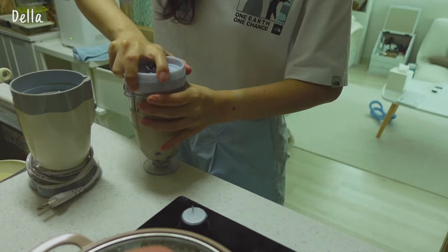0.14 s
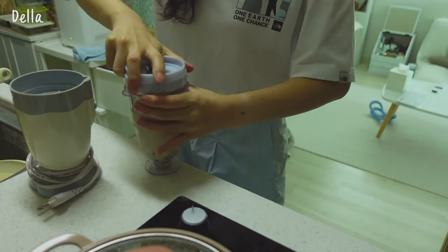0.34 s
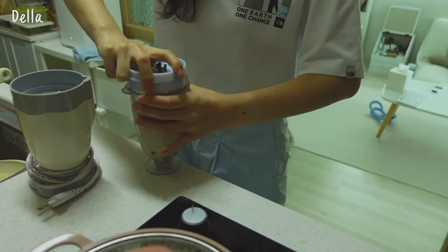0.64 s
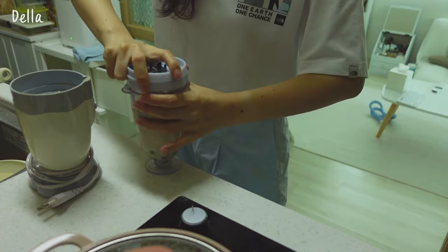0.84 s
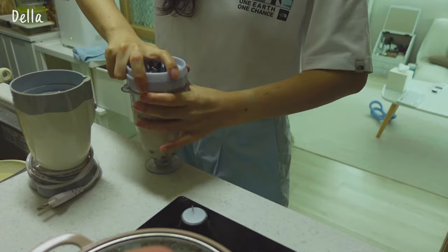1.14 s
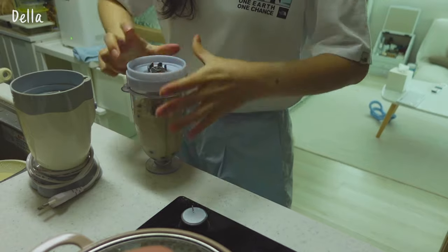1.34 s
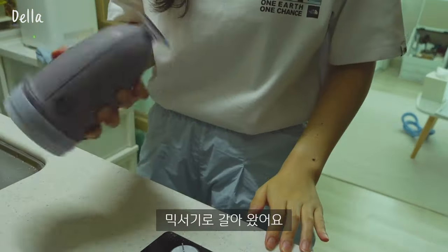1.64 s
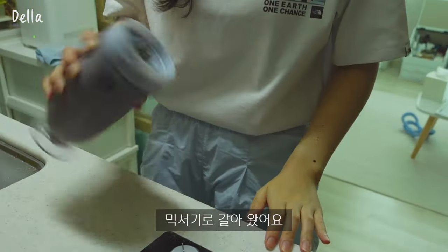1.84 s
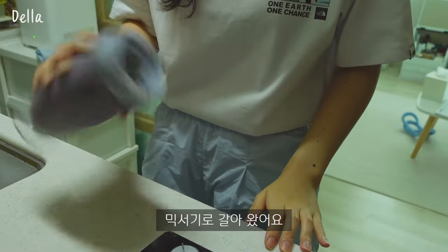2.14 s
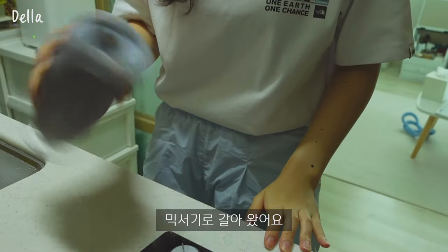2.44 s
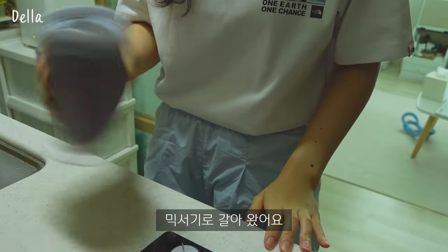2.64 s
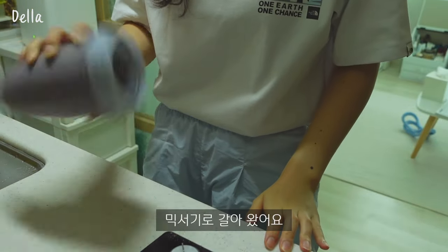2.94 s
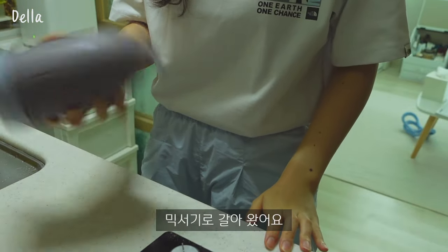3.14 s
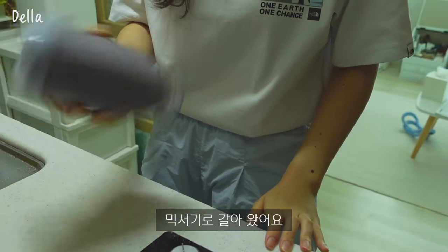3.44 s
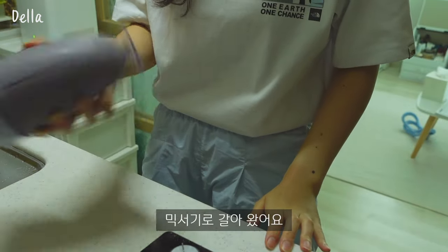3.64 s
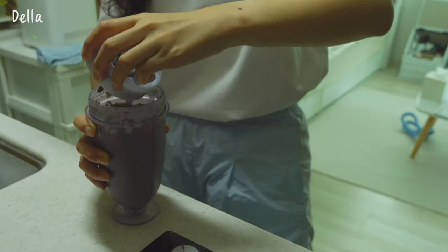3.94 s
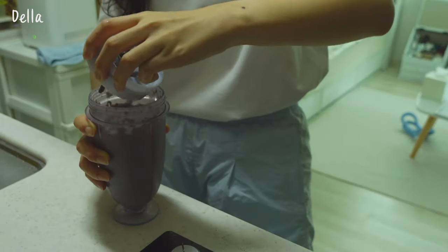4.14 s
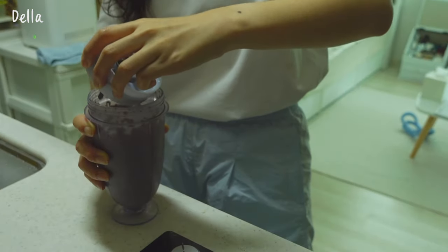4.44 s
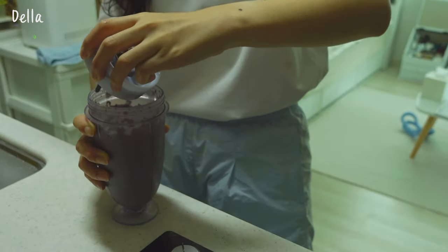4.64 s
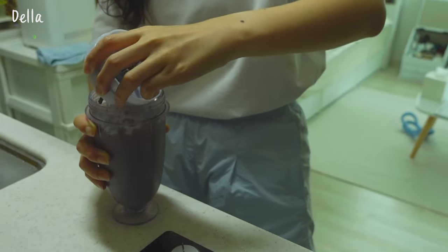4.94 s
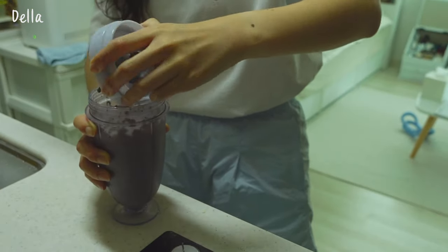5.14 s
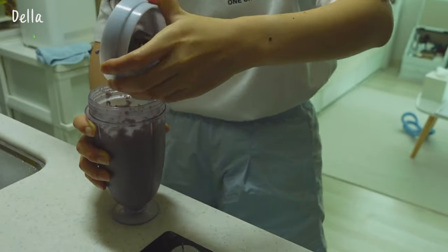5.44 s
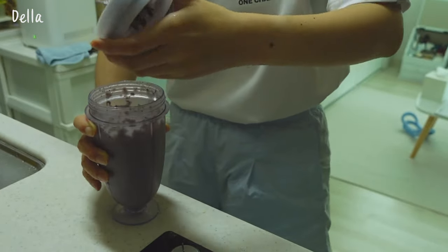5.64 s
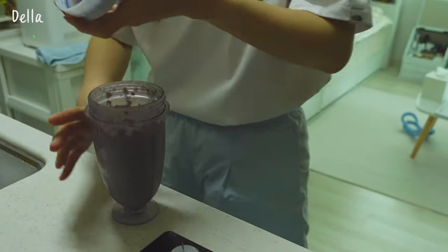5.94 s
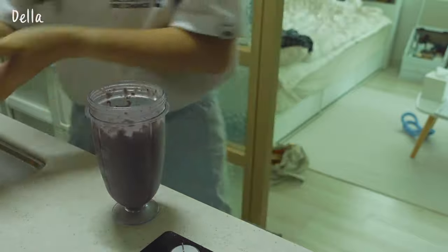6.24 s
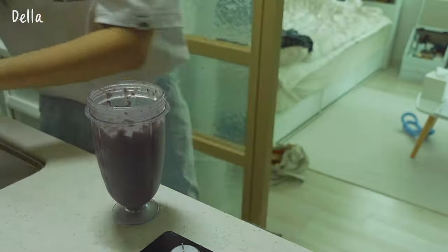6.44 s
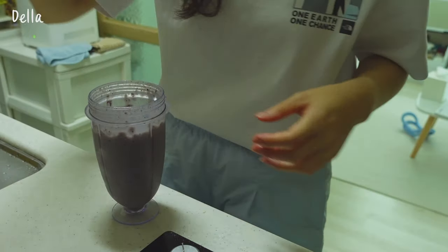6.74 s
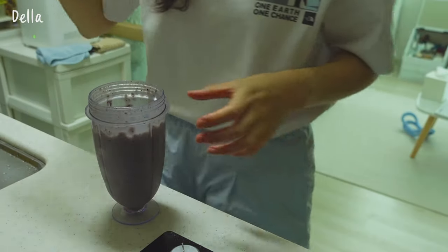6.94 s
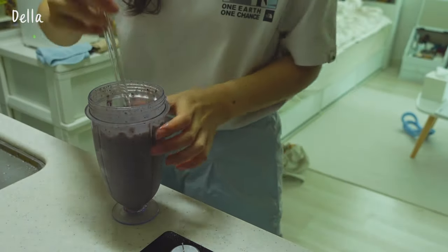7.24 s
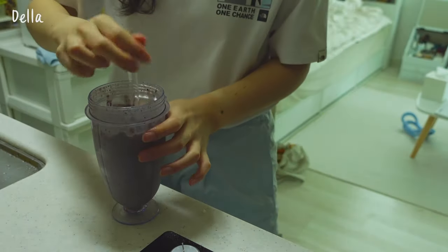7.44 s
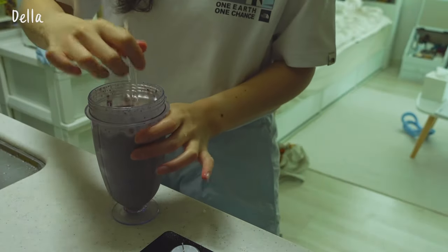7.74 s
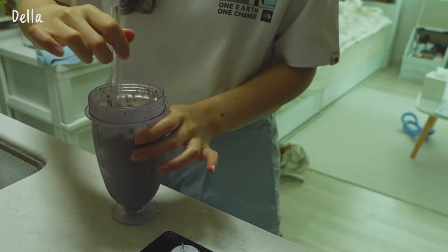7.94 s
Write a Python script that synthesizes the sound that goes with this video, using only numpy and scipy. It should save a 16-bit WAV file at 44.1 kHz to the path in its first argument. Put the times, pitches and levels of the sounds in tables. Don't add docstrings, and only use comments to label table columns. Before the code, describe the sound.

A low, broad appliance hum fills a small, briefly echoing kitchen, heard close from the counter. From 0 to 0.25 s a plastic lid drags and gives tiny sharp thread slips, with soft bumps; at about 0.75 to 1.05 s it creaks in fast, raspy stick-slip chirps, followed by hand rubs and dull bumps. At 1.64 s the sound drops out, fading back by 1.78 s. The cup is shaken until about 3.7 s: irregular short splashes and taps, a clear one at 1.75, the strongest at 3.18. From 3.83 to 4.9 s the lid is knocked on the rim roughly every 0.17 s, hard plastic cracks over a hollow boom and counter thud, with weaker rattles to 5.2. Rubbing follows at 5.64, a faint bright glass touch at 6.54, small ticks, then at 7.49 a loud, hard straw clunk with an immediate bounce and short ring. Hum remains, with a faint bump near 8.03.

```python
import sys
import numpy as np
from scipy import signal
from scipy.io import wavfile

SR = 44100
rng = np.random.default_rng(int(sys.argv[2]) if len(sys.argv) > 2 else 0)


def wrap_up_sound(samples):
    columns = np.atleast_2d(samples).T
    tamed = np.clip(columns, -1, 1)
    steps = np.round(tamed * 32767).astype(np.int16)
    wavfile.write(sys.argv[1], SR, steps)


def how_loud(loudness_db):
    steps = np.asarray(loudness_db, float) / 20
    return 10 ** steps


N = 356328
T = np.arange(N) / SR
EDGES = 30 * 2 ** np.arange(0, 9.4, .5)
MID_SIDE = np.array([[1], [-1]])


def rms_one(x):
    return x / np.sqrt(np.mean(x ** 2) + 1e-20)


def at_hz(points, hz):
    points_hz, values = np.transpose(points)
    return np.interp(np.log(hz), np.log(points_hz), values)


def drift(rate):
    r = np.exp(-80 * np.pi * rate / SR)
    slow = signal.lfilter([1], [1, -2 * r, r * r], rng.standard_normal(N // 40 + 2002))
    slow = rms_one(slow[2000:])
    return np.interp(np.arange(N) / 40, np.arange(len(slow)), slow)


def band(x, low_hz, high_hz, order=2):
    sos = signal.butter(order, [low_hz, min(high_hz, .48 * SR)], "band", fs=SR, output="sos")
    return signal.sosfilt(sos, x)


def resonance(x, hz, width):
    r = np.exp(-np.pi * width / SR)
    return signal.lfilter([(1 - r * r) / 2, 0, (r * r - 1) / 2],
                          [1, -2 * r * np.cos(2 * np.pi * hz / SR), r * r], x)


def strike(times, dbs, modes, spread_db, detune, rise):
    out, t = np.zeros(N + 9000), np.arange(9000) / SR
    hz, mode_db, t60 = np.repeat(modes, 2, axis=0).T[:, :, None]
    mode_db = mode_db - 5 * (np.arange(len(hz))[:, None] % 2)
    luck = rng.standard_normal((len(times), 3, len(hz), 1))
    for s, db, (strong, off, phase) in zip(times, dbs, luck):
        decay = how_loud(mode_db + spread_db * strong - 60 * t / t60)
        rings = decay * np.sin(2 * np.pi * hz * (1 + detune * off) * t + 4 * phase)
        body = rings.sum(axis=0) * (1 - np.exp(-t / rise))
        out[int(s * SR):][:len(t)] += how_loud(db) * body / np.abs(body).max()
    return out[:N]


def add_burst(out, s, db, low_hz, high_hz, t60, rise, order=2):
    t = np.arange(6000) / SR
    noise = rms_one(band(rng.standard_normal(len(t)), low_hz, high_hz, order=order))
    burst = how_loud(db - 60 * t / max(t60, .003)) * (1 - np.exp(-t / rise)) * noise
    i = int(s * SR)
    out[i:i + len(t)] += burst[:N - i]


def strokes(rows):
    out = np.zeros(N)
    for s, attack, hold, t60, db in rows:
        swell = np.clip((T - s) / max(attack, 1e-4), 0, 1) ** 2
        out += swell * how_loud(db - 60 * np.maximum(T - s - attack - hold, 0) / t60)
    return out


def banded_noise(spectrum, patchy_db):
    # f/Hz, correlation [0-1]
    likeness = [(60, 0.83), (240, 0.95), (950, 0.61), (3770, 0.77), (15000, 0.71)]
    out, white = 0, rng.standard_normal((2, 2, N))
    for k, (low, high) in enumerate(zip(EDGES, EDGES[1:])):
        mid, side = band(white[k % 2], low, high)
        hz = np.sqrt(low * high)
        alike = np.clip(at_hz(likeness, hz), 0, 1)
        gain = how_loud(at_hz(spectrum, hz) + patchy_db * drift(9.3))
        out = out + gain * (np.sqrt(1 + alike) * mid + np.sqrt(1 - alike) * side * MID_SIDE)
    return rms_one(out)


def hum():
    # f/Hz, level/dB
    hum_spectrum = [(36, -15), (75, -19), (140, -4.5), (400, -4), (570, -15.5), (1130, -17), (8990, -30.5),
                    (16500, -44)]
    # f/Hz, width/Hz, level/dB
    whines = [(146.3, 2.5, -53), (215, 40, -52.5), (400, 30, -52), (2620, 180, -62.5), (6300, 470, -64),
              (7140, 590, -66.5), (12500, 300, -71)]
    white = rng.standard_normal(N)
    whine = 0
    for hz, width, db in whines:
        whine = whine + how_loud(db) * rms_one(resonance(white, hz, width)) * how_loud(2.0 * drift(3.8))
    rumble_cut = signal.butter(4, 68, "high", fs=SR, output="sos")
    broad = signal.sosfilt(rumble_cut, banded_noise(hum_spectrum, patchy_db=1.8))
    return (how_loud(-40.5) * broad + whine) * how_loud([[-.3], [.3]])


def kitchen(x):
    # f/Hz, t60/s
    room_t60 = [(100, 0.31), (300, 0.32), (1000, 0.29), (4000, 0.2), (14000, 0.19)]
    # f/Hz, level/dB
    room_db = [(100, -11), (500, -10), (3000, -7), (14000, -7)]
    # f/Hz, share [0-1]
    sideways = [(100, 0.029), (500, 0.28), (3000, 0.4), (14000, 0.58)]
    t, tail = np.arange(SR // 2) / SR, 0
    for low, high in zip(EDGES[::2], EDGES[2::2]):
        shared, own = band(rng.standard_normal((2, len(t))), low, high)
        decay = how_loud(-60 * t / at_hz(room_t60, low) + at_hz(room_db, low))
        tail = tail + (shared + at_hz(sideways, low) * own * MID_SIDE) * decay
    tail = tail * (1 - np.exp(-(t / 0.00067) ** 2))
    return signal.fftconvolve(x[None], tail / np.sqrt(SR / 100), axes=1)[:, :N]


def rubbing():
    # f/Hz, level/dB
    skin = [(470, -31), (800, -22), (1950, 1), (2600, 2), (4460, -3.5), (4800, 4.5), (10700, -13),
            (16000, -7)]
    # start t/s, attack/s, hold/s, release t60/s, level/dB
    rubs = [(.3, 0.13, .005, 0.17, -45), (.616, 0.0037, .005, .25, -56), (1.045, .005, 0.006, 0.37, -44.5),
            (1.09, 0.027, 0.21, 1, -52.5), (1.228, .004, 0.0045, 0.11, -47), (5.638, .004, 0.11, 0.17, -39),
            (5.75, 0.074, 0.14, .2, -53.5)]
    grains = rng.standard_normal((2, N)) * how_loud(2.0 * drift(80))
    colour = 0
    for k, (low, high) in enumerate(zip(EDGES[9:], EDGES[10:])):
        colour = colour + how_loud(at_hz(skin, np.sqrt(low * high))) * band(grains[k % 2], low, high)
    return rms_one(colour) * strokes(rubs)


def handling():
    # t/s, peak level/dB, f/Hz, bright edge over the peak/dB
    taps = [(0.376, -46, 2140, -3), (1.7548, -22, 1770, -11.5), (1.9789, -35, 1990, -29),
            (2.3414, -34.5, 1780, -35), (2.6249, -36.5, 2220, -27), (2.7685, -36, 1510, -14),
            (2.8863, -27, 1790, -19.5), (3.0886, -36.5, 2120, -22), (3.114, -34.5, 1340, -13),
            (3.1216, -28, 1830, -27), (3.1795, -14, 1730, -14), (3.3618, -29, 1180, -23.5),
            (3.4176, -38, 1790, -24), (3.4645, -34.5, 2300, -31), (3.6151, -29, 2140, -14.5),
            (3.7313, -29, 2140, -21)]
    # t/s, peak level/dB, f/Hz, dull body over the peak/dB
    ticks = [(0.6706, -48, 8800, -11), (0.703, -50, 9250, -11), (1.2308, -45, 6150, 3.5),
             (1.2854, -50, 6300, 3), (5.0985, -45.5, 6470, 4.5), (5.2705, -49, 6600, 4),
             (6.0995, -51.5, 6140, -7), (6.536, -42.5, 7540, 9), (6.649, -47.5, 9500, 4),
             (6.9325, -45, 5800, -9), (7.1894, -53, 5070, -3)]
    # t/s, peak level/dB, f/Hz, t60/s
    bumps = [(0.019, -40, 228, 0.17), (0.178, -42, 184, 0.17), (0.435, -31.5, 175, 0.17),
             (0.88, -35, 172, 0.11), (1.248, -30.5, 236, 0.12), (1.429, -43, 573, 0.1),
             (1.599, -44, 332, 0.1), (2.24, -26.5, 298, 0.064), (2.885, -35, 366, 0.17),
             (3.361, -31, 525, 0.085), (6.536, -35, 400, 0.08), (8.035, -42, 220, 0.33)]
    # t/s, peak level/dB, f/Hz, t60/s
    sparks = [(0.146, -38, 2200, 0.14), (.2, -39, 2280, 0.13), (5.642, -34.5, 3570, 0.057),
              (5.72, -36, 733, 0.19), (6.539, -38.5, 5670, 0.13), (6.538, -50, 1100, 0.054),
              (6.934, -39, 13500, .04), (6.95, -40, 12500, 0.059), (3.1788, -18, 2160, 0.025),
              (3.18, -28, 5440, .07)]
    out = np.zeros(N)
    both = [(s, db, hz, db + edge_db, 3800, 0.031) for s, db, hz, edge_db in taps]
    both += [(s, db + body_db, 2250, db, hz, 0.057) for s, db, hz, body_db in ticks]
    for s, db, hz, edge_db, edge_hz, t60 in both:
        add_burst(out, s, db, hz / 1.66, hz * 1.36, t60, .0004)
        add_burst(out, s, edge_db + 8, edge_hz, edge_hz * 1.21, 1.46 * t60, .0003, order=1)
    for s, db, hz, t60 in bumps:
        add_burst(out, s, db + 5.5, hz / 1.26, hz * 1.19, t60, 0.29 / hz)
    for s, db, hz, t60 in sparks:
        add_burst(out, s, db, hz / 1.1, hz * 1.07, t60, .0005)
    return out


def glassware():
    # t/s, peak level/dB
    straw_drop = [
        (7.488, -13),
    ]
    # f/Hz, level/dB, t60/s
    straw_modes = [(229.5, -3, 0.11), (429, -4, 0.13), (444, 1, 0.18), (484, -7, 0.046), (539, -6.5, 0.12),
                   (757, -12, 0.11), (1350, 0, 0.076), (1390, 0.5, 0.14), (1480, 0.5, 0.061),
                   (2460, -23, .04)]
    # t/s, peak level/dB
    lid_clink = [
        (6.535, -39),
    ]
    # f/Hz, level/dB, t60/s
    glass_modes = [(8200, -4, 0.22), (12880, -2, 0.14)]
    (s, db), (clink_s, clink_db) = straw_drop[0], lid_clink[0]
    out = strike([s, s + 0.0055], [db + 2.5, db + 1.5], straw_modes, 0.73, 0.0162, 0.00089)
    out = out + strike([clink_s], [clink_db + 10], glass_modes, 0, 0.0035, .0003)
    add_burst(out, s, db - 12, 300, 1700, .16, .001)
    add_burst(out, s, db - 2.5, 3000, 4300, .025, .0002)
    add_burst(out, s, db - 7.0, 1700, 6000, .06, .0001)
    add_burst(out, s, db - 7.5, 3000, 11000, .03, .0001)
    add_burst(out, s, db + 5.0, 2500, 12000, .003, .00003, order=1)
    return out


def creak():
    # start t/s, attack/s, hold/s, release t60/s, level/dB
    twists = [
        (.75, 0.028, 0.029, 0.24, -34),
        (0.818, 0.016, 0.096, 0.061, -37.5),
        (0.966, 0.0061, 0.084, .07, -41),
    ]
    twist_s = (.195, 0.13)
    # at the start/Hz, at the end/Hz
    slips_per_s = [(330.3, 150), (250, 140)]
    # start t/s, attack/s, hold/s, release t60/s, level/dB
    drag = [
        (0.0, 0.00056, 0.18, .9, -48.5),
        (.14, .005, 0.062, .15, -49),
    ]
    # t/s, peak level/dB
    slips = [(0.1446, -20), (0.196, -21.5), (0.2144, -30), (0.2239, -22.5), (0.2319, -19.5), (0.7572, -21)]
    # f/Hz, width/Hz, level/dB
    thread = [(2300, 740, -1.5), (4900, 700, 3), (5630, 1000, 3), (7550, 560, 2.5), (9240, 1800, 1.5),
              (12000, 1400, 0.5), (14200, 1400, 2)]
    # loose f/Hz, tight f/Hz
    grip_hz = (3600, 3920)
    tightens_s = (0.85, 0.82)
    tight_share = (0.054, .75)
    # start t/s, end t/s
    damped_s = (.855, 0.9)

    speed = []
    for (s, *_), length, (fast, slow) in zip(twists[::2], twist_s, slips_per_s):
        speed += [(s, fast), (s + 0.41 * length, fast), (s + length, slow)]
    rate = np.interp(T, *np.transpose(speed)) * how_loud(.4 * drift(60))
    turns = np.cumsum(rate) / SR
    beats = np.diff(np.floor(turns), prepend=0) * how_loud(1.5 * rng.standard_normal(N))
    grind = signal.lfilter([1], [1, -.96], beats) * rng.standard_normal(N)
    snaps = band(beats, 2500, 7000, order=1)
    chatter = .7 * rms_one(snaps) + .35 * rms_one(grind) + .6 * rng.standard_normal(N)
    drive = chatter * strokes(twists) * how_loud(6.5)
    drive = drive + strokes(drag) * how_loud(6.5) * rng.standard_normal(N)
    for s, db in slips:
        add_burst(drive, s, db + 1.5, 3000, 14000, .016, .0001, order=1)

    tight = np.where(T < twists[0][0], .6, np.interp(T, tightens_s, tight_share))
    tight = np.clip(tight, 0, 1)
    grip = resonance(drive * (1 - tight), grip_hz[0], 340) + resonance(drive * tight, grip_hz[1], 420)
    out = how_loud(8.5 + np.interp(T, damped_s, (0, -1.5))) * grip
    for k, (hz, width, db) in enumerate(thread):
        out = out + (-1) ** k * how_loud(db) * resonance(drive, hz, width)
    return out


def knocks():
    # crack/dB, shine/dB, wall ring/dB
    rim_knocks = [(3.8343, -16.5, 5.5, 1, 1), (4.0446, -18.5, 6, 5.5, 3.5), (4.2157, -15, 5, 5, -2.5),
                  (4.2636, -35.5, 11, 8.5, 9), (4.3867, -17.5, 5, 3.5, 1.5), (4.5553, -20, -6, 4, 1.5),
                  (4.557, -24, 12, 8, 2), (4.7209, -23.5, 0, 8.5, -2), (4.7246, -14, 3, 5.5, -0.5),
                  (4.8688, -17.5, 4.5, 4.5, -1.5), (4.8742, -24.5, 9.5, 10, 4), (4.99, -39, 3, 2, -11),
                  (5.007, -30.5, 2, 4.5, 0), (5.0212, -30, 3.5, 5, -8), (5.214, -29, -0.5, -11, 1.5)]
    # f/Hz, level/dB, t60/s
    counter_modes = [(110.8, -9.5, 0.3), (143.3, -4, 0.2), (166.7, -0.5, 0.22), (207.6, 5, 0.19)]
    # f/Hz, level/dB, t60/s
    boom_modes = [(233.6, -0.5, 0.14), (260, 3.5, 0.081), (275, -3.5, 0.086), (309.8, 1.5, 0.11),
                  (372, -14.5, 0.21)]
    # f/Hz, level/dB, t60/s
    wall_modes = [(444, 0, 0.14), (531.5, -5.5, 0.13), (541.4, 5.5, 0.12), (578, -0.5, 0.077),
                  (647, -8.5, 0.079), (757, -12, 0.13), (982, -5.5, 0.1), (1194, -8.5, 0.05)]
    # f/Hz, level/dB, t60/s
    lid_modes = [(6136, 2, 0.021), (7450, -12, 0.0079)]
    s, boom_db, crack_db, shine_db, wall_db = np.transpose(rim_knocks)
    crack_db, shine_db, wall_db = boom_db + crack_db, boom_db + shine_db, boom_db + wall_db
    thud_db = -26 + 0.3 * (boom_db + 23.5)
    out = strike(s, thud_db + 8.5, counter_modes, 0.98, 0.017, 0.0038)
    out = out + strike(s, boom_db + 11, boom_modes, 0.73, 0.024, 0.0014)
    out = out + strike(s, wall_db + 8.5, wall_modes, 0.42, 0.025, 0.00099)
    out = out + strike(s, shine_db - 1.5, lid_modes, 1.3, 0.017, 0.00031)
    for at, crack, shine, wall, boom in zip(s, crack_db, shine_db, wall_db, boom_db):
        add_burst(out, at, wall + 0.5, 480, 1350, .09, .001)
        add_burst(out, at, boom - 5, 150, 380, .13, .002)
        add_burst(out, at, crack + 4.5, 1200, 4800, .015, .0002)
        add_burst(out, at, shine + 6, 4600, 12500, .025, .0005)
        add_burst(out, at, crack - 11.5, 1200, 4800, .12, .003)
        add_burst(out, at, shine - 7.0, 4600, 12000, .1, .003)
    return out


def scene():
    blows = knocks() + glassware()
    hands = handling() + creak() + rubbing()
    direct = blows * how_loud([[-.5], [.5]]) + hands * how_loud([[.1], [-.1]])
    picked_up = band(direct + kitchen(blows + hands), 61, 10900)
    return picked_up + hum()


def roll_off(x):
    return signal.sosfilt(signal.butter(12, 16810, fs=SR, output="sos"), x)


def record(dry):
    # t/s, gain/dB
    level_ride = [
        (0, -7.5),
        (1.642, -9),
        (1.644, -51),
        (1.70, -26.5),
        (1.751, -12),
        (1.78, -10),
    ]
    s, db = np.transpose(level_ride)
    top_cut = signal.cheby2(10, 60, 17100, fs=SR, output="sos")
    mix = signal.sosfilt(top_cut, dry) * how_loud(np.interp(T, s, db))
    return roll_off(mix)


dry = scene()
out = record(dry)
wrap_up_sound(out)
```